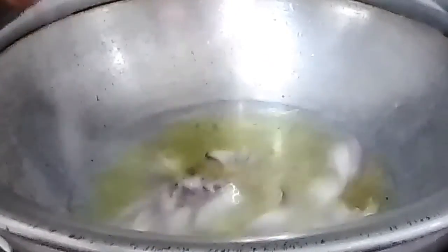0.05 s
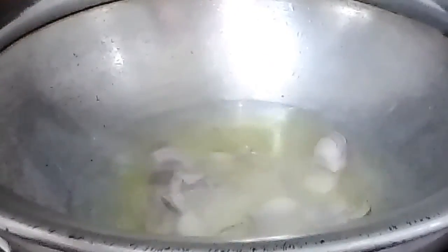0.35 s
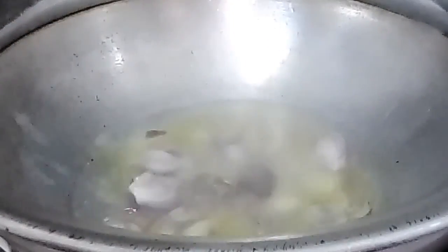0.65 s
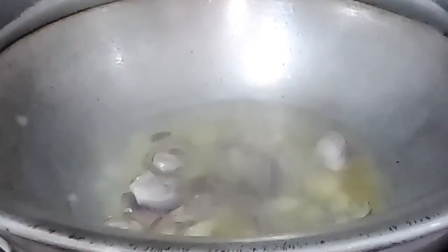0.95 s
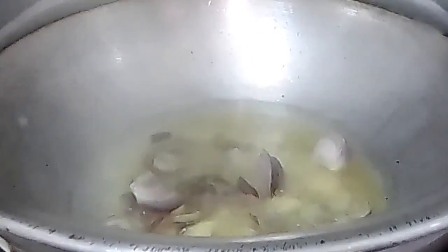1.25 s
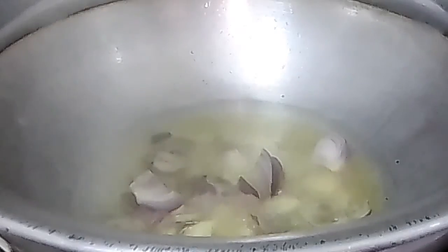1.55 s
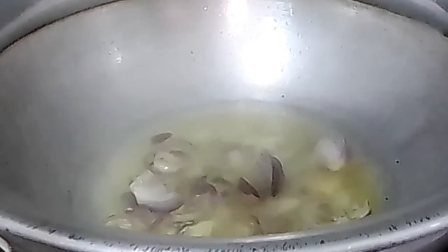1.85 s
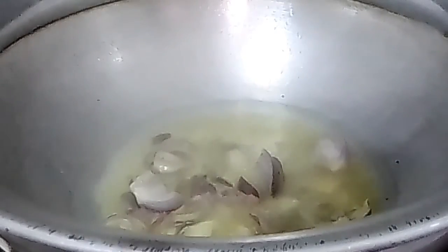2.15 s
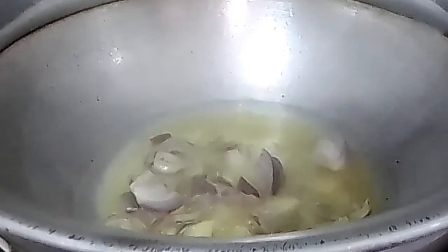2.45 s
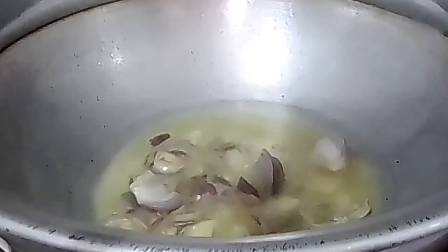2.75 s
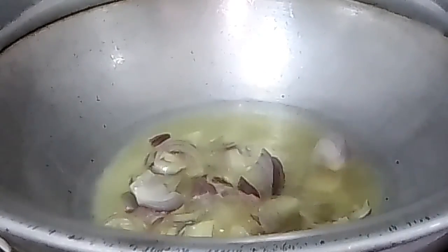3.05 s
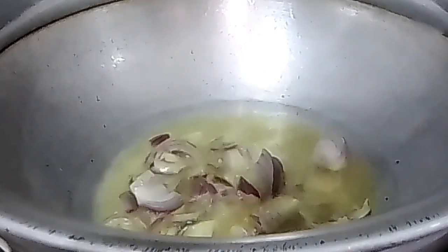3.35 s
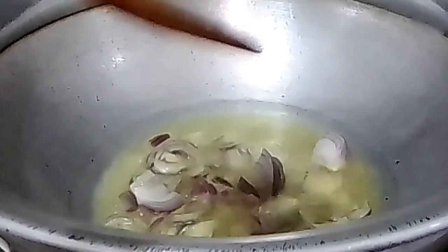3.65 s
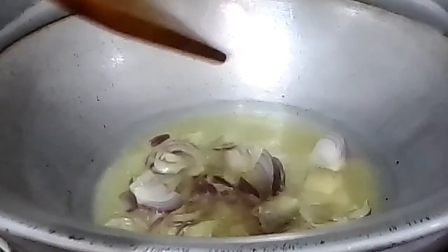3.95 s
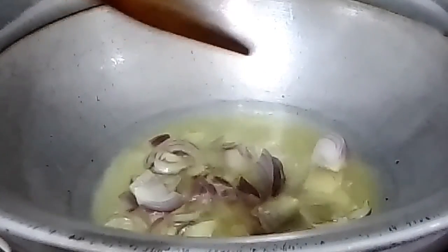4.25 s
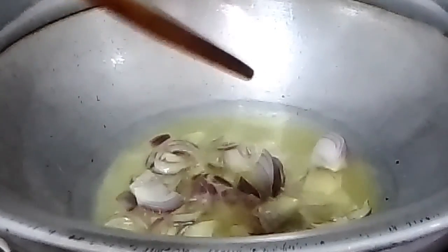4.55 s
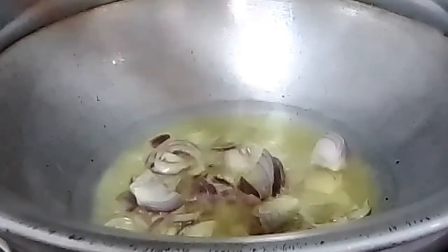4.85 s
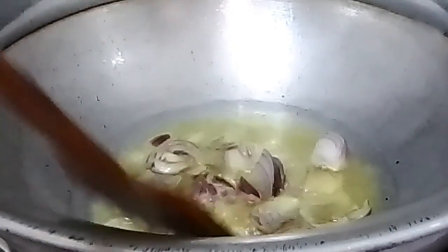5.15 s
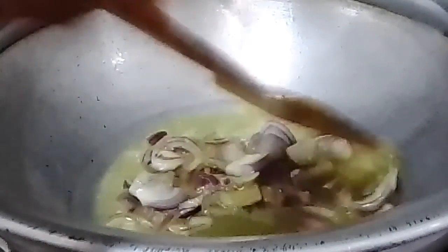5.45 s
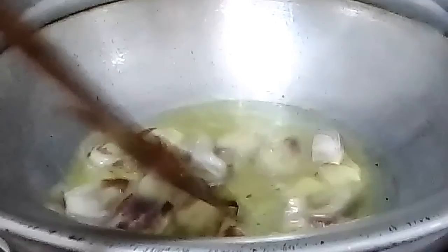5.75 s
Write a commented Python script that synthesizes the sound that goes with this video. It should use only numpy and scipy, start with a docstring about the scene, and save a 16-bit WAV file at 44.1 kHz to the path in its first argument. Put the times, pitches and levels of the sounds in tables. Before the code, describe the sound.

Right at the start, chopped onion hits hot oil in a metal pot with a loud, dense, bright sizzle, heard close up in a small kitchen. Short squeaks of steam cut through the first half second. From about 0.8 to 2.4 seconds, larger bubbles burst in a run of small hollow plops and spatters. After about 2 seconds the sizzle steadily thins into lighter frying, with scattered spits and prickles. A faint, thin whistle sounds behind it from roughly 1.1 to 1.8 seconds and again from 2.4 to 2.9. The hiss dulls briefly around 5 seconds. At about 5.3 and 5.6 seconds a wooden spoon knocks on the pot, each dull hit chattering slightly with a short, low ring, and the sizzle picks up a little. The burner's quiet, low rush continues underneath throughout.

```python
"""Onion hitting hot oil

Chopped onion has just dropped into a metal pot on a burner, close up in a small kitchen. Its water
flashes to steam in a dense, bright sizzle that thins as it fries, with pops and short steam squeaks.
Near the end a wooden spoon knocks twice on the pot and stirs the sizzle up again.
Underneath sit a faint, thin whistle and the low rush of the burner."""
import sys
import numpy as np
from scipy import signal
from scipy.fft import rfft, irfft
from scipy.io import wavfile

SR = 44100
rng = np.random.default_rng(int(sys.argv[2]) if len(sys.argv) > 2 else 0)


def wrap_up_sound(samples):
    """Save the sound to the file named by the first command line argument, as 16-bit audio."""
    columns = np.atleast_2d(samples).T
    # keep every value between -1 and 1, then stretch to whole-number steps
    tamed = np.clip(columns, -1, 1)
    steps = np.round(tamed * 32767).astype(np.int16)
    wavfile.write(sys.argv[1], SR, steps)


N = 255601
TIME = np.arange(N) / SR


def from_db(db):
    """Decibels to gain."""
    return 10 ** (np.asarray(db) / 20)


def rms_one(x):
    """Scale to an rms of 1."""
    return x / np.sqrt(np.mean(x ** 2) + 1e-20)


def drift(rate_hz):
    """A smooth random modulator with an rms of 1."""
    hop, settle = 40, 2000
    r = np.exp(-2 * np.pi * hop * rate_hz / SR)
    noise = rng.standard_normal(N // hop + settle + 2)
    slow = signal.lfilter([1], [1, -2 * r, r * r], noise)[settle:]
    return np.interp(np.arange(N) / hop, np.arange(len(slow)), rms_one(slow))


def pulse(colour, size=2048):
    """The tightest causal click with this EQ curve (minimum phase); peak 1."""
    hz, level_db = np.transpose(colour)
    bin_hz = np.arange(size // 2 + 1) * SR / size
    gain = from_db(np.interp(np.log(bin_hz + 1), np.log(hz), level_db))
    cepstrum = irfft(np.log(gain))[:size // 2]
    cepstrum[1:] *= 2
    shape = irfft(np.exp(rfft(cepstrum, size)))
    return shape / np.abs(shape).max()


def through(x, response):
    """Pass a sound through an impulse response."""
    return signal.fftconvolve(x, response)[:N]


def resonance(x, hz, width_hz):
    """A band-pass with unity gain at its peak."""
    r = np.exp(-np.pi * width_hz / SR)
    feedback = [1, -2 * r * np.cos(2 * np.pi * hz / SR), r * r]
    return signal.lfilter(np.array([1, 0, -1]) * (1 - r * r) / 2, feedback, x)


def low_cut(x, hz, order):
    """Roll off the bass."""
    return signal.sosfilt(signal.butter(order, hz, "high", fs=SR, output="sos"), x)


# EQ curves of the four bubble sizes, large to fine: (frequency [Hz], relative level [dB])
GURGLE_EQ = [(120, -32), (190, -26), (250, -11.5), (330, -2.5), (520, 4), (720, 1), (900, 4), (1200, 1),
             (2500, -24.5)]
BOIL_EQ = [(100, -32), (500, -49), (800, -10), (1050, 5), (1330, 3.5), (1500, 0.5), (1750, 4), (2150, 4.5),
           (2550, 1.5), (2850, 3), (3250, 1), (4200, 1.5), (7000, -23.5), (12000, -42)]
FIZZ_EQ = [(150, -56), (1500, -30.5), (2900, -10.5), (3700, -5), (4500, 1), (5500, 3), (6500, 0),
           (7500, -1), (9000, -4), (10000, -6), (10800, -11.5), (15000, -47)]
SPRAY_EQ = [(300, -61), (5000, -28), (8000, -0.5), (10000, -0.5), (10800, 4.5), (12500, 3.5), (14000, 2),
            (15700, -2.5)]
def sizzle(gurgle_db, boil_db, fizz_db, spray_db):
    """Four sizes of bubble share one surge as water reaches the oil."""
    surge = drift(33.5)
    gurgle = bubbles(gurgle_db, GURGLE_EQ, 1.46 * surge,
                     spread_db=2.5, hiss_db=-2, clump_db=-0.15, swell_db=0.5)
    boil = bubbles(boil_db, BOIL_EQ, 0.85 * surge,
                   spread_db=2.5, hiss_db=-2, clump_db=0.75, swell_db=0.5)
    fizz = bubbles(fizz_db, FIZZ_EQ, -0.1 * surge,
                   spread_db=2, hiss_db=6, clump_db=0.91, swell_db=-0.76)
    spray = bubbles(spray_db, SPRAY_EQ, 0.6 * surge,
                    spread_db=4.5, hiss_db=3, clump_db=0.8, swell_db=0.1)
    return gurgle + boil + fizz + spray


def bubbles(level_db, colour, surge_db, spread_db, hiss_db, clump_db, swell_db):
    """Bursts of uneven size come in clumps and thin out, over the hiss of countless smaller ones."""
    first_bursts_per_s, half_life_s = 6800, 3.7
    chance = np.clip(first_bursts_per_s * 0.5 ** (TIME / half_life_s) / SR, 1e-4, 1)
    sizes = from_db(spread_db * np.minimum(rng.exponential(1, N), 5)) * rng.choice([-1, 1], N)
    bursts = rms_one(sizes * (rng.random(N) < chance) / np.sqrt(chance))
    clumps = from_db(surge_db + clump_db * drift(29) + swell_db * drift(4))
    hiss = from_db(hiss_db) * rng.standard_normal(N)
    sound = through(clumps * (bursts + hiss), pulse(colour))
    sound = low_cut(sound, hz=110, order=2)  # bubbles are too small to make bass
    return from_db(level_db) * rms_one(sound)


# Brief treble dips, deepest as the spoon reaches in: (time [s], half-length [s], depth in the spray [dB])
TREBLE_DUCKS = [(0.52, 0.11, 6), (4.8, 0.29, 10), (5.157, 0.1, 15.5)]
def frying():
    """Level envelopes in dB of the four bubble sizes; the fine ones flash first and duck the most."""
    dip_db = sum(depth_db * np.exp(-((TIME - s) / half_s) ** 2) for s, half_s, depth_db in TREBLE_DUCKS)
    gurgle_db = steam(flash_db=-33, flash_s=0.16, wet_db=-34, dry_s=1.8,
                      juice_db=-39, fade_db_per_s=2, stir_db=-46.5)
    boil_db = steam(flash_db=-23.5, flash_s=0.18, wet_db=-27.5, dry_s=1.79,
                    juice_db=-30.5, fade_db_per_s=3, stir_db=-49)
    fizz_db = steam(flash_db=-21, flash_s=0.051, wet_db=-27.5, dry_s=1.49,
                    juice_db=-27.5, fade_db_per_s=2.5, stir_db=-43)
    spray_db = steam(flash_db=-31, flash_s=0.083, wet_db=-36, dry_s=1.86,
                     juice_db=-31.5, fade_db_per_s=4, stir_db=-47.5)
    return gurgle_db, boil_db - 0.033 * dip_db, fizz_db - 0.04 * dip_db, spray_db - dip_db


def steam(flash_db, flash_s, wet_db, dry_s, juice_db, fade_db_per_s, stir_db):
    """Envelope in dB: a flash on landing, the cut faces boiling dry, the juice failing, then the stir."""
    flash_width_s, wet_rise_s, drying_s = 0.31, 0.13, 0.37
    stir_at_s, stir_rise_s = 5.26, 0.19  # the spoon turns wet sides into the oil
    flash = from_db(flash_db) * np.exp(-((TIME - flash_s) / flash_width_s) ** 2)
    wet = from_db(wet_db) * (1 - np.exp(-TIME / wet_rise_s)) / (1 + np.exp((TIME - dry_s) / drying_s))
    juice = from_db(juice_db - fade_db_per_s * TIME)
    stir = from_db(stir_db) * np.clip((TIME - stir_at_s) / stir_rise_s, 0, 1)
    return 10 * np.log10(flash ** 2 + wet ** 2 + juice ** 2 + stir ** 2)


# Peaks and notches of the pot and the air in it: (frequency [Hz], width [Hz], relative boost [dB])
POT_RESONANCES = [(309, 28, 7.5), (416, 17, 4.5), (495, 16, 5), (551, 25, 5), (746, 84, 0.5),
                  (1048, 31, 0.5), (1133, 25, -1), (1190, 8.7, 2), (1335, 39, 0), (1378, 19, 3.5),
                  (1638, 45, 4.5), (1718, 22, 2), (1985, 42, 1.5), (2460, 110, 4.5), (2610, 85, 4),
                  (3052, 25, 6.5), (3197, 81, 4), (3598, 156, 5.5), (4130, 20, 2), (4110, 12, 5),
                  (4370, 40, 3.5), (4730, 52, 5.5), (5470, 35, -5), (5100, 240, 1.5), (5540, 120, 2),
                  (6260, 34, 0.5), (6110, 85, 3.5), (6790, 59, 4), (7700, 51, 1), (8300, 32, -14),
                  (13300, 200, -2)]
def pot(x, waver_db=2.5, waver_hz=9, trim_db=-1.06):
    """The bowl colours the sizzle, each resonance wavering as the bubbles shift from place to place."""
    return x + sum((from_db(boost_db + trim_db + waver_db * drift(waver_hz)) - 1) * resonance(x, hz, width)
                   for hz, width, boost_db in POT_RESONANCES)


# A close pair of modes in the pot's wall: (frequency [Hz], filter width [Hz])
WALL_RING = [(1848, 50), (1936, 160)]
def pot_wall(boil_db, under_db=-9.5, waver_db=1.5, waver_hz=4):
    """Countless bursts keep the metal ringing and beating, as strongly as the onion boils."""
    ring = np.zeros(N)
    for hz, width in WALL_RING:
        mode = resonance(rng.standard_normal(N), hz, width)
        ring += rms_one(resonance(mode, hz, 3 * width))
    return from_db(boil_db + under_db + waver_db * drift(waver_hz)) * rms_one(ring)


# EQ curve of flung droplets: (frequency [Hz], relative level [dB])
SPATTER_EQ = [(100, -39), (300, -12), (500, -4), (750, -8.5), (1000, 2), (1900, -1.5), (4500, -7),
              (9000, -28), (16000, -34)]
# Big bubbles popping: (time [s], pitch [Hz], relative plop level [dB], relative spatter level [dB])
POP_CUES = [(0.769, 564, -21, -19.5), (0.869, 570, -22, -37), (0.992, 543, -22, -19),
            (1.090, 593, -20, -35), (1.144, 500, -24, -27), (1.183, 550, -20.5, -36),
            (1.260, 576, -21, -30), (1.372, 550, -22, -21.5), (1.412, 580, -24, -34),
            (1.460, 550, -20.5, -16.5), (1.572, 554, -24, -38), (1.586, 510, -24, -42),
            (1.781, 545, -26, -34), (1.834, 550, -32, -40), (2.084, 545, -23.5, -29),
            (2.148, 540, -29, -35), (2.313, 555, -29, -32), (2.381, 530, -28, -39),
            (4.115, 520, -54, -33.5)]
def pops(gain_db=0.5, plop_t60_s=0.045, attack_s=0.001, spatter_s=0.008):
    """A big bubble opens with a short hollow plop and throws a little spatter."""
    t = TIME[:SR // 10]
    out = np.zeros(N)
    for s, hz, plop_db, spatter_db in POP_CUES:
        plop = np.sin(2 * np.pi * hz * t) * from_db(plop_db - 60 * t / plop_t60_s)
        grit = rms_one(through(rng.standard_normal(len(t)), pulse(SPATTER_EQ))[:len(t)])
        spatter = from_db(spatter_db) * grit * np.exp(-(t / spatter_s) ** 2)
        start = int(s * SR)
        out[start:start + len(t)] += (plop + spatter) * (1 - np.exp(-t / attack_s))
    return from_db(gain_db) * out


# Steam squeaks: (time [s], pitch [Hz], relative level [dB], decay [s], filter width [Hz])
SQUEAK_CUES = [(0.008, 6000, -27, .09, 1500), (0.060, 1180, -31, 0.049, 70.4),
               (0.083, 1067, -28, 0.023, 70.4), (0.108, 1190, -26, 0.035, 70),
               (0.128, 1740, -22, 0.048, 500), (0.215, 4620, -24, 0.031, 1000),
               (0.243, 1870, -21, 0.013, 150), (0.51, 1930, -32, .1, 180), (0.589, 1850, -20.5, 0.026, 380),
               (0.61, 1840, -29, 0.072, 110), (1.675, 5050, -26, .025, 1100),
               (1.975, 2500, -26.5, 0.019, 550), (2.154, 4570, -33, .043, 950),
               (2.659, 3380, -30, 0.026, 600), (2.94, 4800, -35, 0.13, 1050), (3.188, 1840, -34, .012, 242),
               (3.536, 1870, -35, .02, 300), (3.640, 5830, -35, .024, 1400),
               (3.7645, 5300, -27, 0.012, 1800), (3.93, 1820, -45, 0.14, 70),
               (4.024, 5200, -33.5, .017, 1200), (4.32, 5000, -39, .05, 1500),
               (4.412, 3700, -41, .045, 200), (4.484, 6530, -34, 0.012, 300),
               (4.524, 5450, -34.5, .028, 1600), (4.561, 3720, -38, 0.038, 450),
               (4.667, 4680, -37, .021, 900), (4.900, 4700, -34, .013, 1700), (4.974, 5200, -40, .012, 600),
               (5.305, 3950, -34.5, .012, 900), (5.319, 5100, -34, .025, 900),
               (5.381, 5000, -31.5, 0.012, 700), (5.728, 5930, -38, .091, 1400)]
def squeaks(gain_db=1.0):
    """Steam trapped under the larger pieces squeals out."""
    return from_db(gain_db) * jets(SQUEAK_CUES)


def jets(cues, attack_s=0.00037):
    """Each jet of steam starts fast and runs out; a narrow band pings, a wide one rasps."""
    t = TIME[:SR // 4]
    out = np.zeros(N)
    for s, hz, level_db, decay_s, width_hz in cues:
        noise = rng.standard_normal(2 * len(t))
        jet = resonance(resonance(noise, hz, width_hz), hz, width_hz)[len(t):]
        envelope = (1 - np.exp(-t / attack_s)) * np.exp(-(t / decay_s) ** 1.5)
        note = rms_one(jet * envelope) * np.sqrt(np.mean(envelope ** 2))
        start = int(s * SR)
        out[start:start + len(t)] += from_db(level_db) * note[:N - start]
    return out


def spits(bed_db, count=150, under_db=-9, spread_db=3.5, low_hz=3800, high_hz=7000,
          decay_s=0.018, narrow_hz=450, wide_hz=2000):
    """Small jets, random in time, pitch and roughness, ride on the level of a sizzle layer."""
    when, pitch, size, rough = rng.random((count, 4)).T
    times_s = when * TIME[-1]
    levels_db = np.interp(times_s, TIME, bed_db) + under_db + spread_db * (2 * size - 1)
    pitches_hz = low_hz * (high_hz / low_hz) ** pitch
    widths_hz = narrow_hz * (wide_hz / narrow_hz) ** rough
    return jets(zip(times_s, pitches_hz, levels_db, [decay_s] * count, widths_hz))


def prickle(spray_db):
    """The tiniest jets prickle at the top of the spray."""
    return spits(spray_db, count=320, under_db=-10, low_hz=7500, high_hz=15000,
                 decay_s=0.01, narrow_hz=120, wide_hz=600)


# Two spoon hits, each with its chatter: (time [s], strength [dB])
SPOON_HITS = [(5.26832, -24.2), (5.27179, -22.6), (5.29857, -26.3), (5.30418, -24.8), (5.3221, -39),
              (5.63651, -23.7), (5.6722, -28.3), (5.6944, -33.5)]
# The pot's ring under the spoon: (frequency [Hz], relative level [dB], t60 [s])
STRUCK_POT_MODES = [(300, -24, .17), (385, -33, .3), (503, -21.5, .42), (518.6, -14, .42),
                    (543.8, -5.2, .25), (567.6, -8, .12), (613.8, -16, .37), (766, -14.5, .14),
                    (971, -11.5, .08), (1096, -19, .16)]
def spoon(contact_s=0.0002):
    """Wood on a loaded pot: dull knocks and a low, beating ring; the pot radiates no bass."""
    hits = np.zeros(N)
    for s, strength_db in SPOON_HITS:
        hits[int(s * SR)] += from_db(strength_db)
    t = TIME[:SR // 2]
    ring = sum(from_db(level_db - 60 * t / t60) * np.sin(2 * np.pi * hz * t)
               for hz, level_db, t60 in STRUCK_POT_MODES)
    knocks = through(hits, ring * (1 - np.exp(-t / contact_s)))
    return low_cut(knocks, hz=260, order=4)


# The whistle's entries: (start [s], end [s], level [dB])
WHISTLE_CUES = [(1.12, 1.50, -43.5), (1.50, 1.82, -45.5), (2.40, 2.90, -48.5)]
def whistle(pitch_hz=816, fade_s=0.044, waver_db=1.5, wobble_hz=3):
    """A thin, slightly unsteady note comes and goes behind the sizzle."""
    level = sum(from_db(level_db) * np.clip(np.minimum(TIME - start, end - TIME) / fade_s, 0, 1)
                for start, end, level_db in WHISTLE_CUES)
    phase = 2 * np.pi * np.cumsum(pitch_hz + wobble_hz * drift(5.3)) / SR
    return level * from_db(waver_db * drift(0.7)) * np.sqrt(2) * np.sin(phase)


# EQ curve of the burner: (frequency [Hz], relative level [dB])
BURNER_EQ = [(25, -26), (60, -31), (80, -8), (105, -18.5), (132, -2.5), (160, -14), (200, 0), (240, 9.5),
             (300, 14.5), (400, 5.5), (700, 3), (2000, -12.5)]
def burner(level_db=-47.5, flutter_db=-0.5):
    """The low, steady rush under the pot."""
    rush = rms_one(through(rng.standard_normal(N), pulse(BURNER_EQ, size=8192)))
    return from_db(level_db + flutter_db * drift(3.1)) * rush


def kitchen(x, t60_s=0.66, reverb_db=-10, predelay_s=0.003):
    """Near walls add a short, dense, faint tail."""
    t = TIME[:SR // 2]
    tail = rng.standard_normal(len(t)) * from_db(-60 * t / t60_s) * (t > predelay_s)
    return x + from_db(reverb_db) * through(x, tail / np.linalg.norm(tail))


def scene():
    """Everything reaches one close microphone, so both channels are alike."""
    gurgle_db, boil_db, fizz_db, spray_db = frying()
    oil = pot(sizzle(gurgle_db, boil_db, fizz_db, spray_db)) + pops()
    cooking = oil + pot_wall(boil_db) + squeaks() + spits(fizz_db) + prickle(spray_db)
    mix = kitchen(cooking) + spoon() + whistle() + burner()
    return np.array([mix, mix])


def record(dry, cutoff_hz=15750):
    """A steep high cut takes off the very top."""
    return signal.sosfilt(signal.ellip(12, 0.1, 80, cutoff_hz, fs=SR, output="sos"), dry)


dry = scene()
out = record(dry)
wrap_up_sound(out)
```